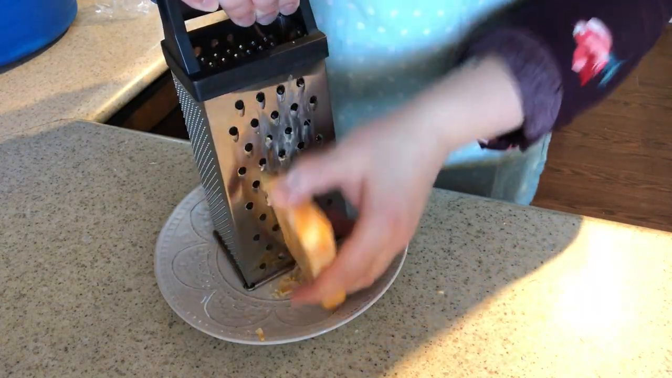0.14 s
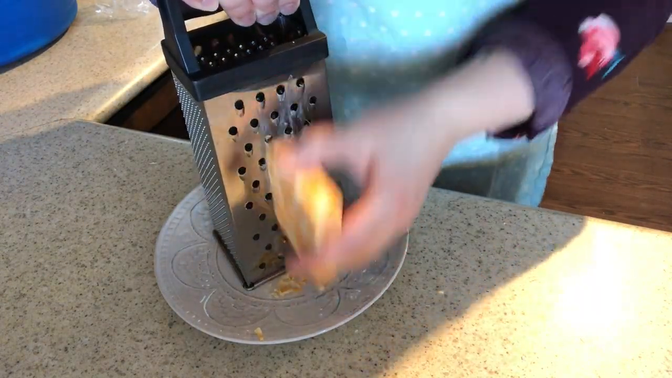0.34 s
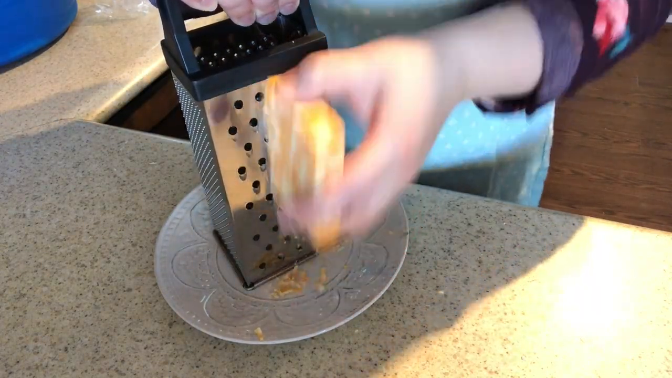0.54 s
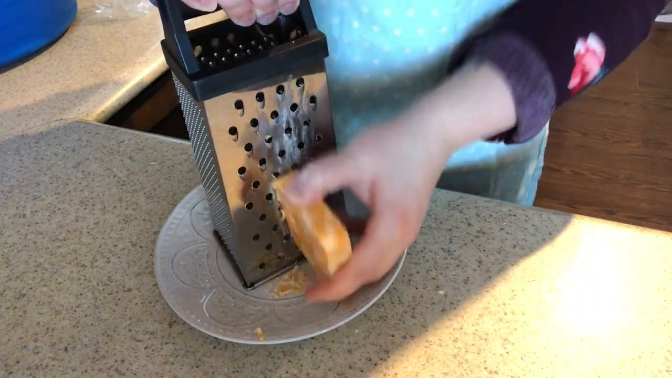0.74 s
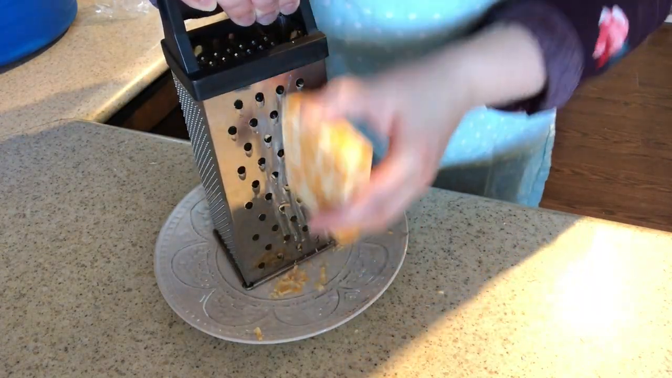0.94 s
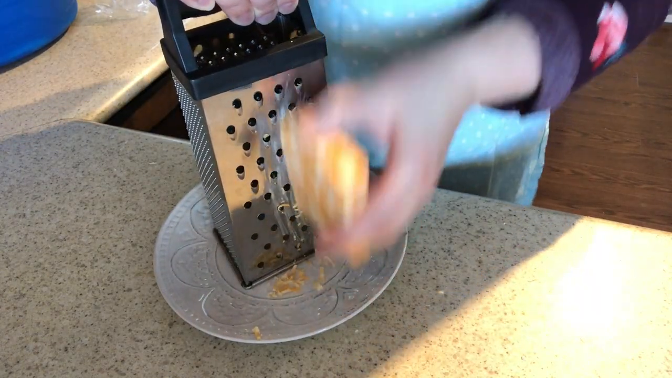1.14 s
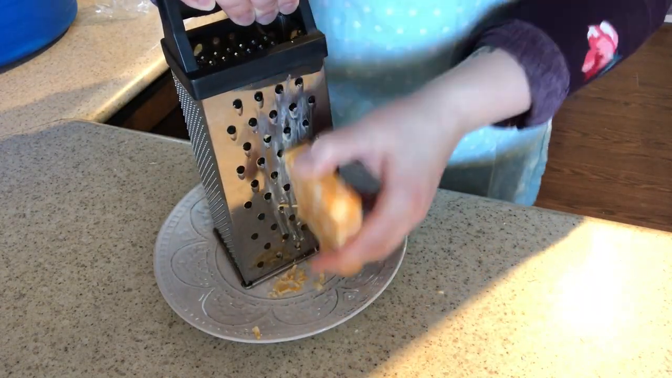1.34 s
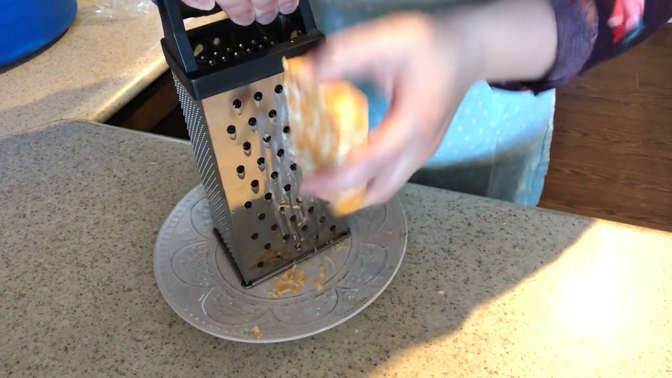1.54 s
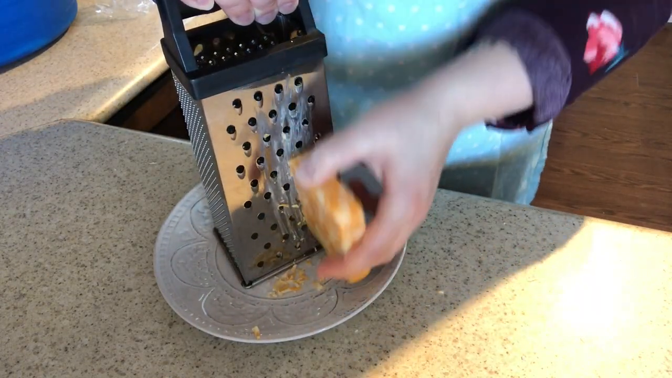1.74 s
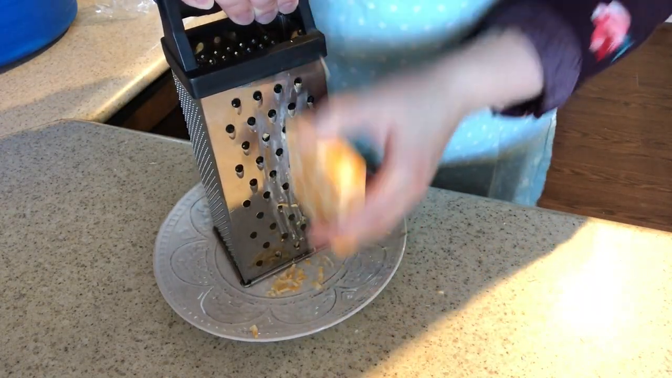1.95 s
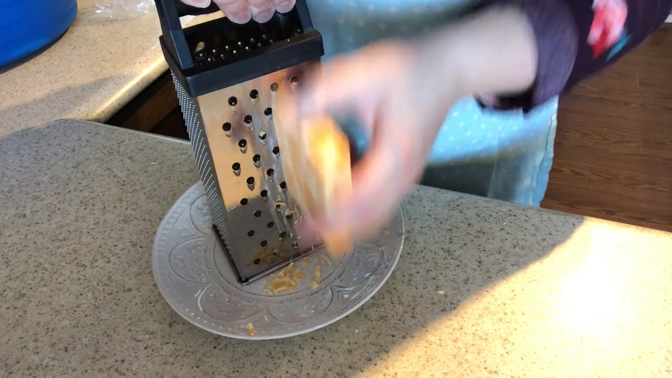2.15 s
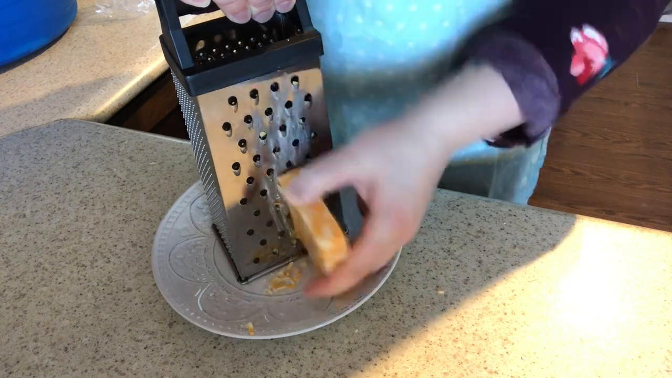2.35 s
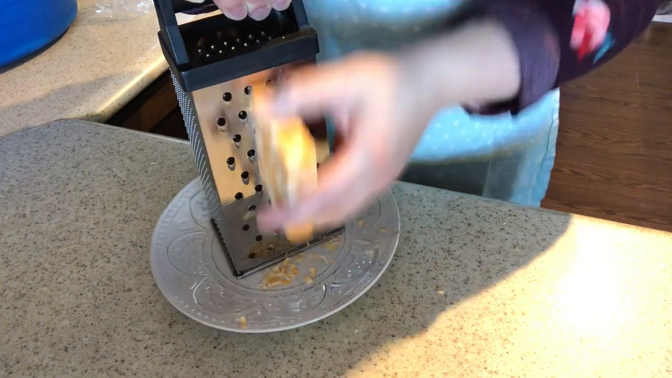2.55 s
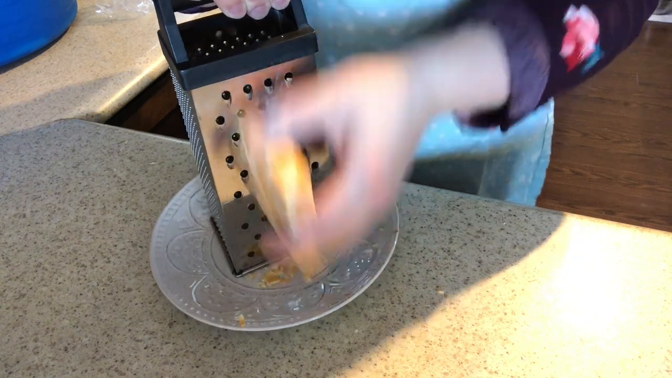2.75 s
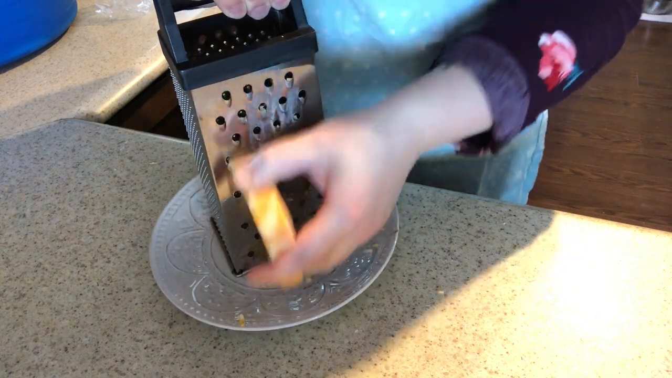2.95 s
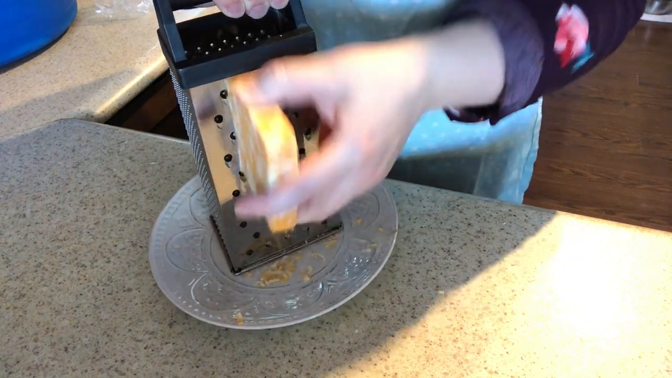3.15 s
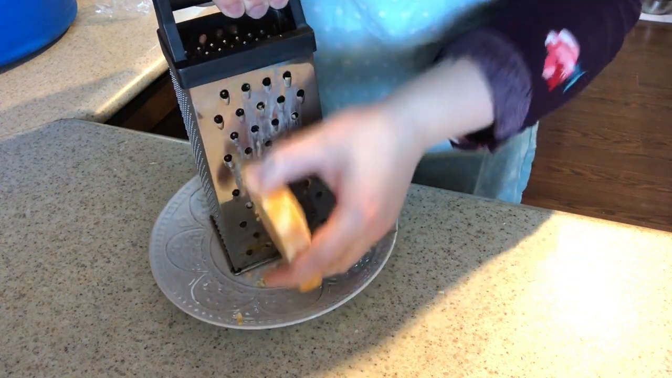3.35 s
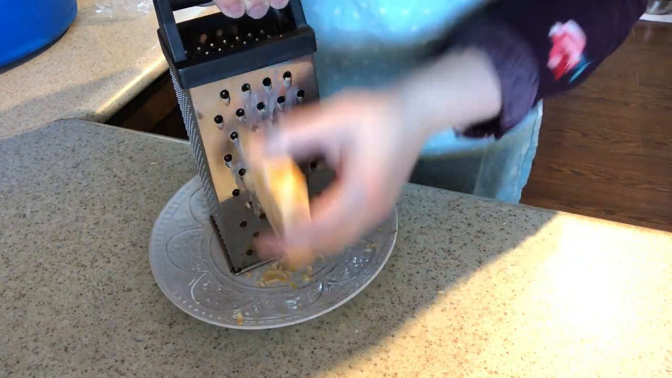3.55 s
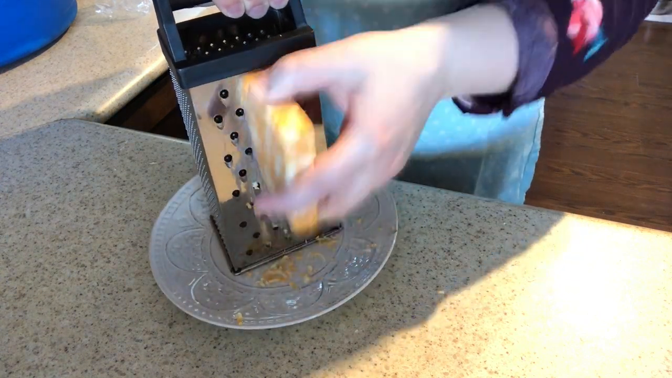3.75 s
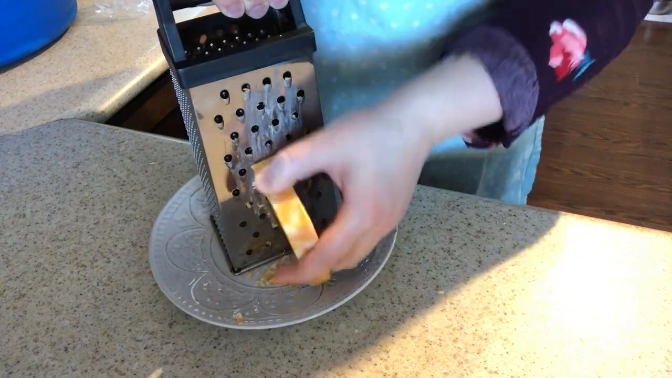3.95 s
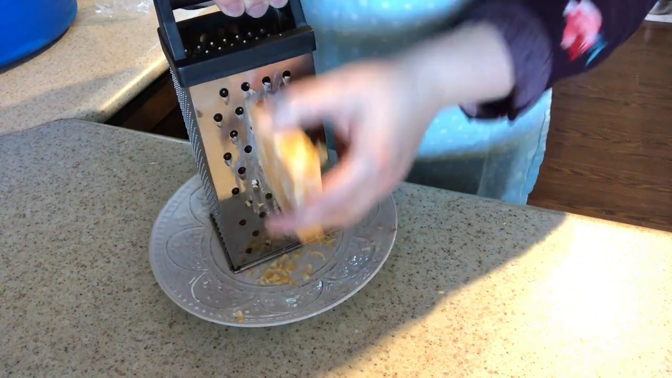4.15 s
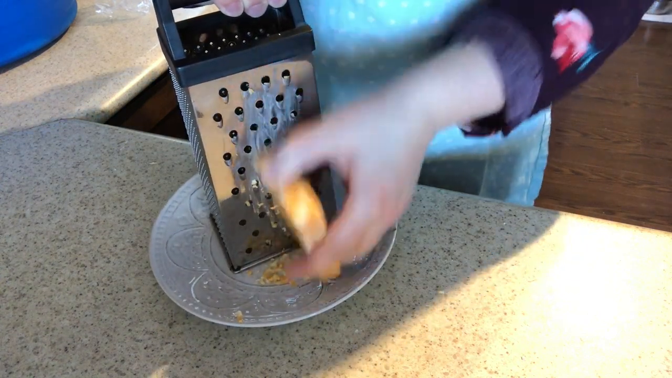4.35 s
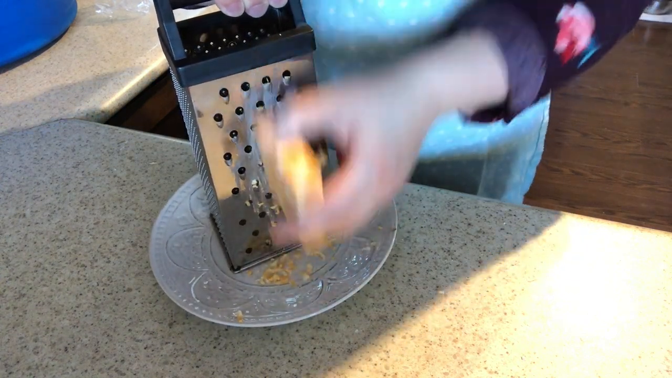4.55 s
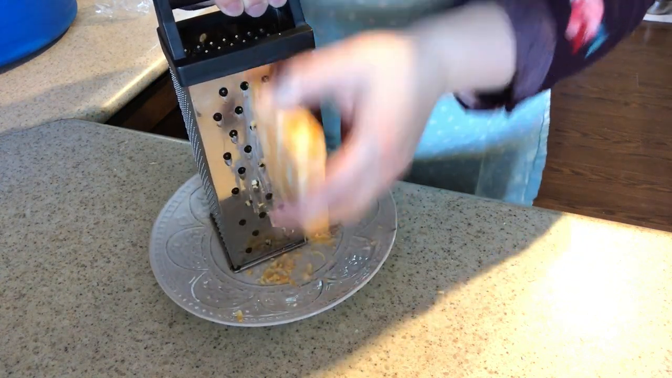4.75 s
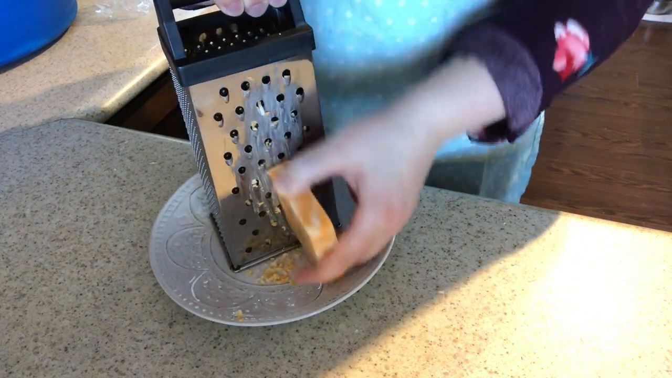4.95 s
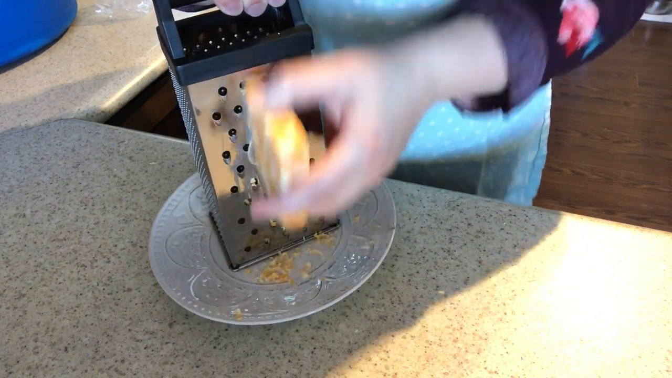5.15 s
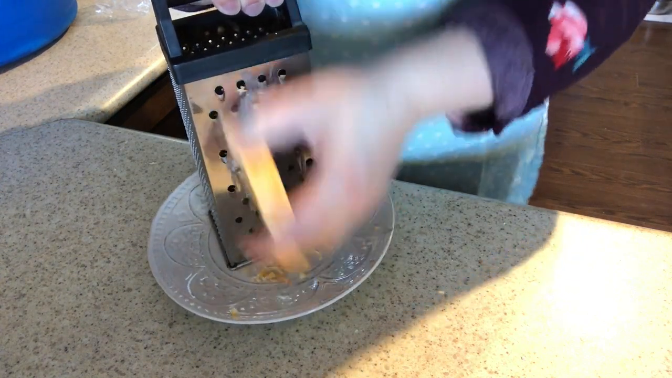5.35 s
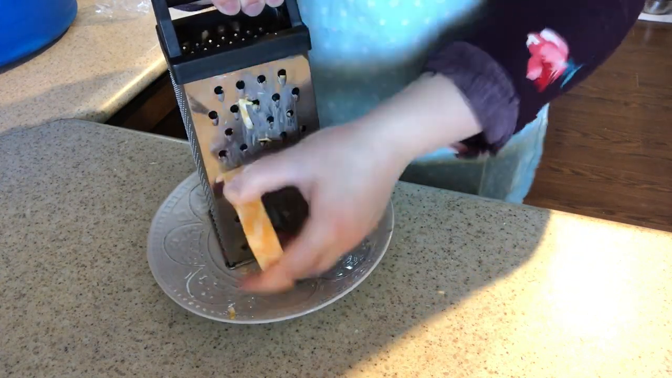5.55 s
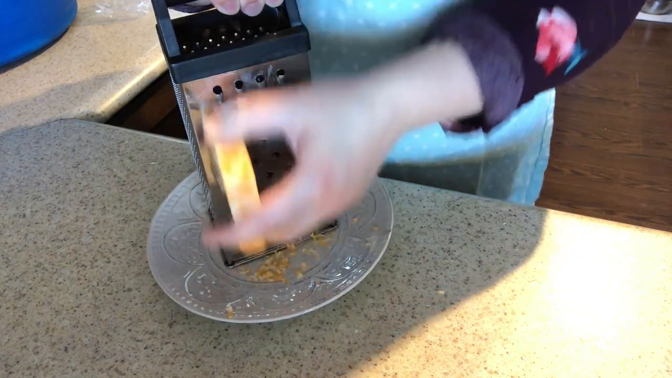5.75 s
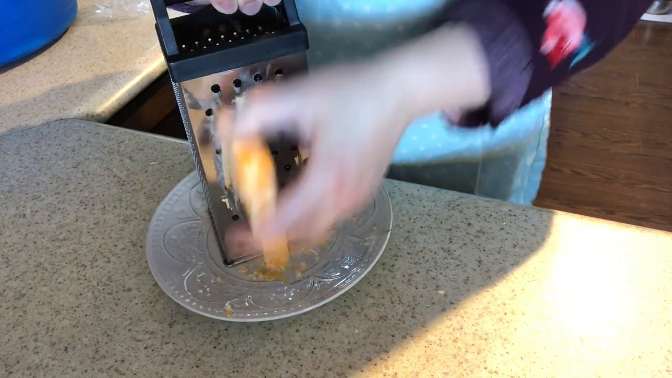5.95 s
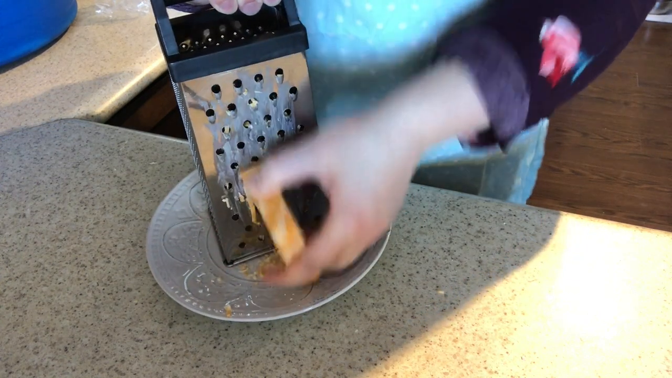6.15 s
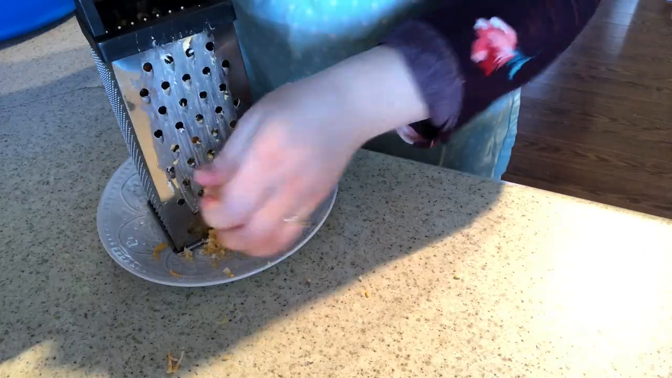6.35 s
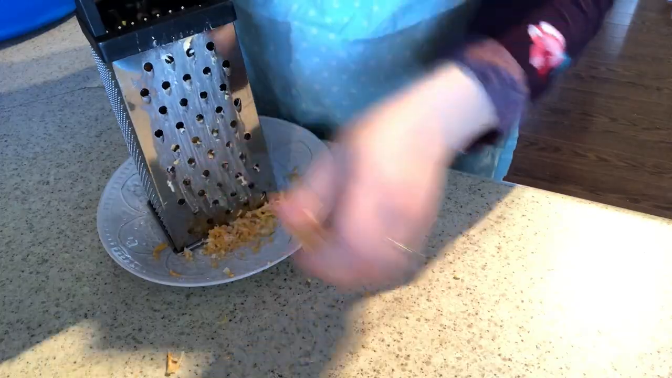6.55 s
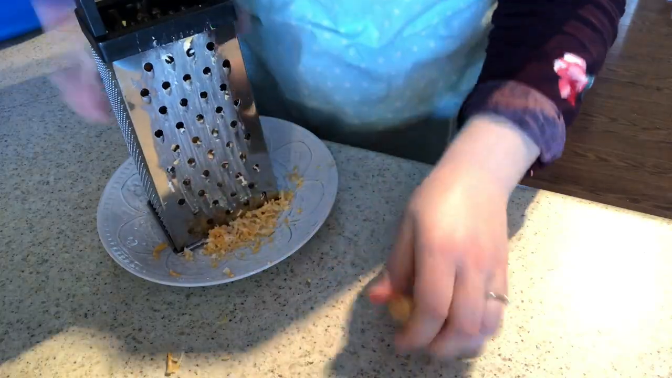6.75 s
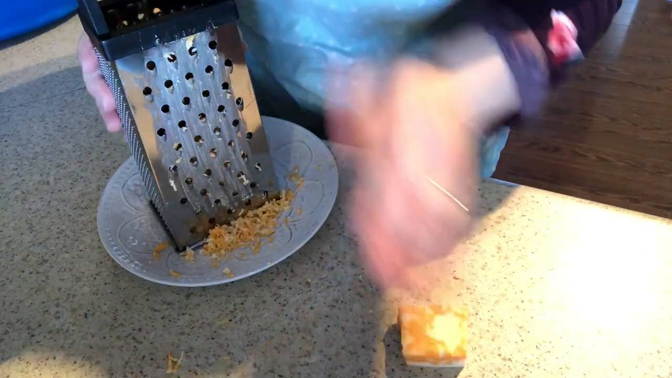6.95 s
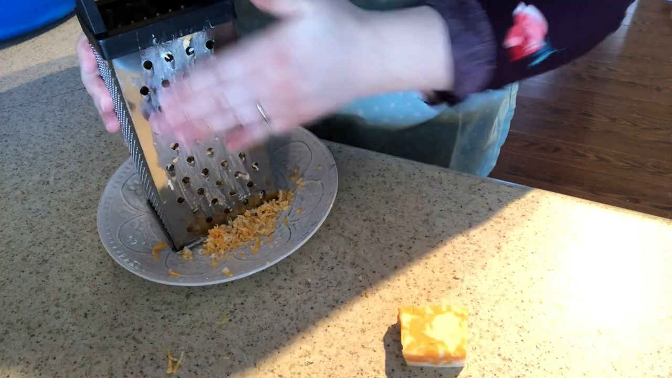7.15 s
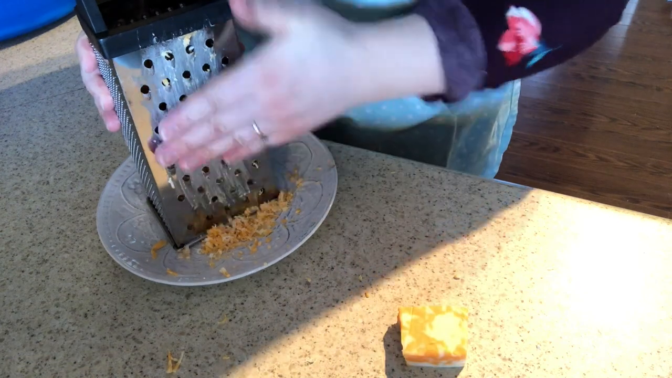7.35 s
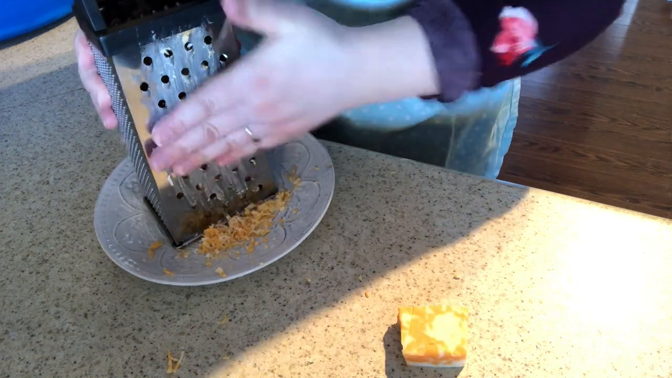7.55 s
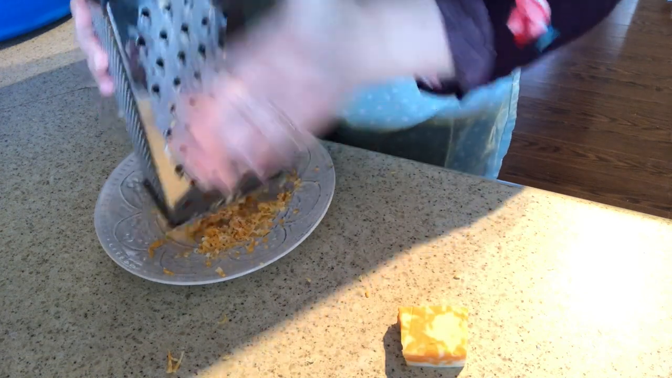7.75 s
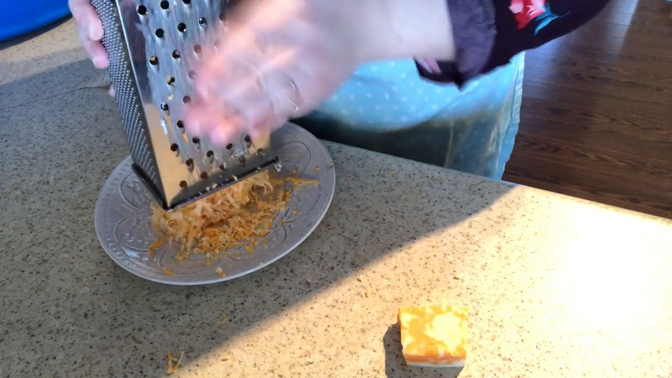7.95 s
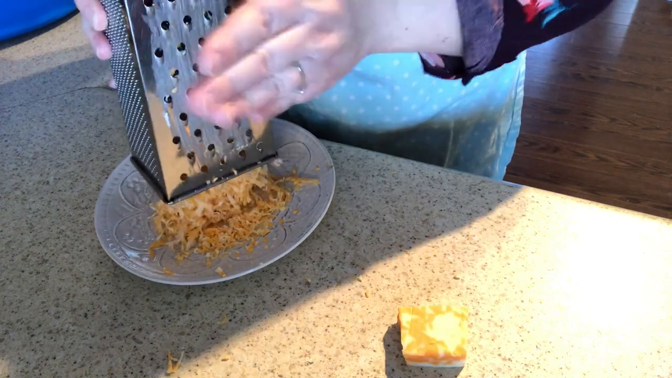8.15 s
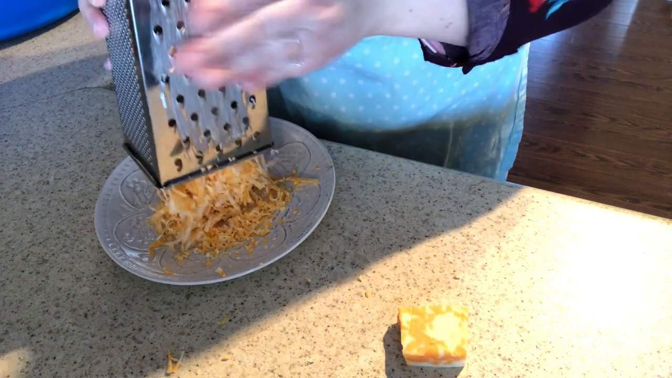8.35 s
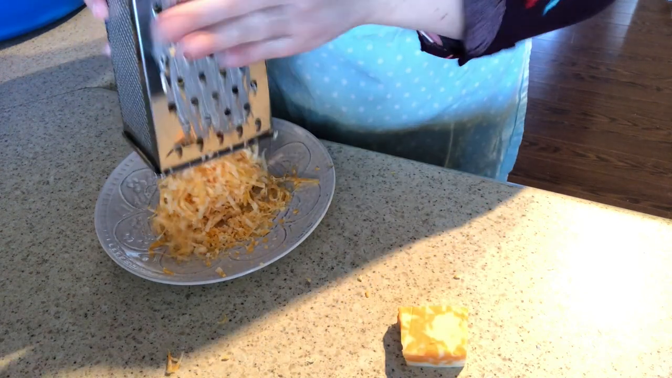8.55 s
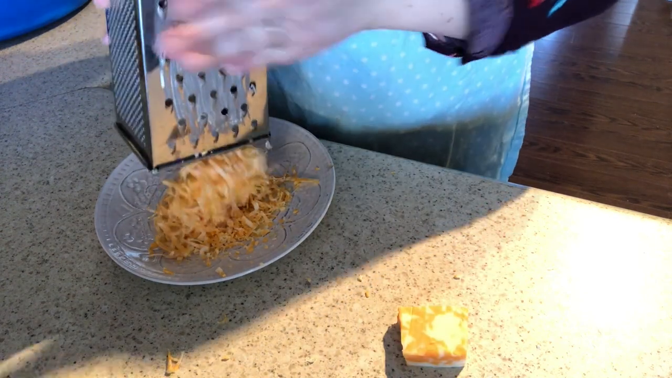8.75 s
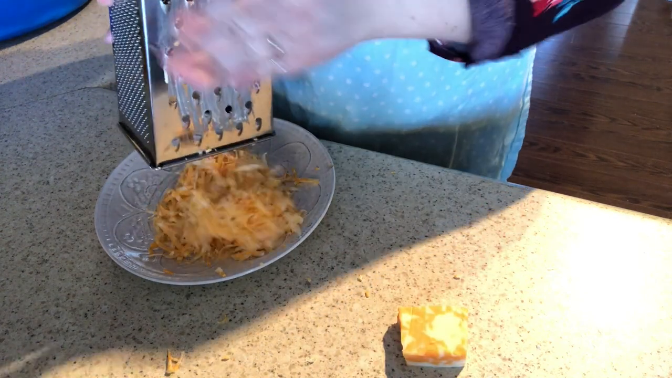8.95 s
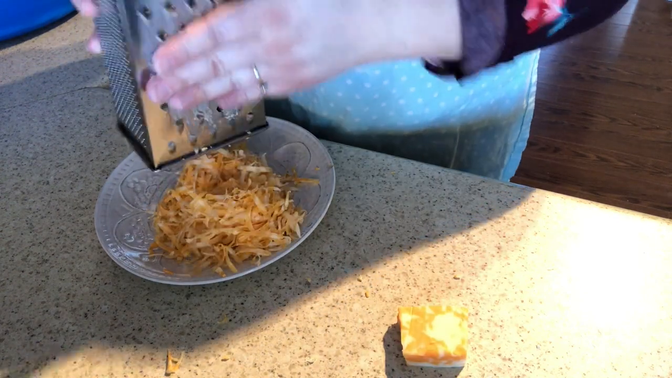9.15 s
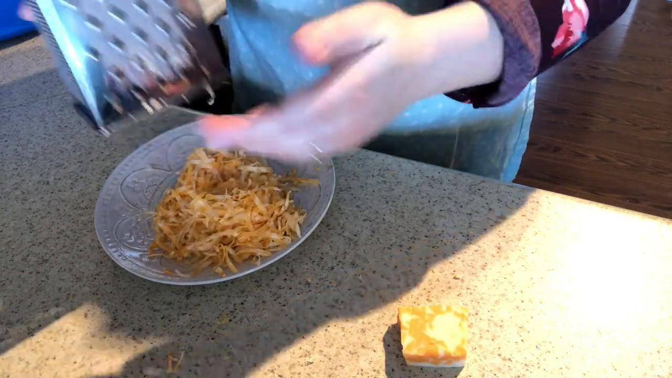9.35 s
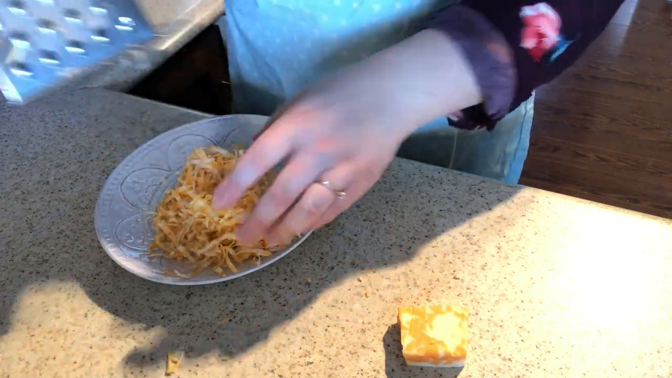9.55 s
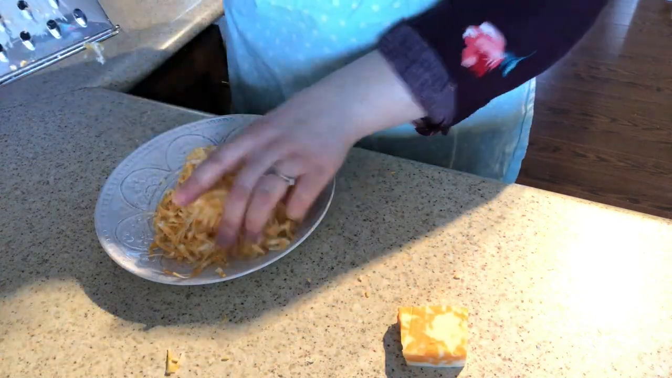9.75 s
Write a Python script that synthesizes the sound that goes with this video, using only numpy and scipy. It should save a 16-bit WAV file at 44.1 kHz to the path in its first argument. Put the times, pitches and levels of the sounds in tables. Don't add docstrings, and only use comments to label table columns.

```python
import sys
import numpy as np
from scipy import signal
from scipy.fft import rfft, irfft
from scipy.io import wavfile

SR = 44100
rng = np.random.default_rng(int(sys.argv[2]) if len(sys.argv) > 2 else 0)


def volts_from_db(level):
    exponent = np.asarray(level, float) / 20
    return 10 ** exponent


def unload_wav(signal):
    wavfile.write(
        sys.argv[1],
        SR,
        np.round(np.clip(np.atleast_2d(signal).T, -1, 1) * 32767).astype(np.int16),
    )


N = 432180


def rms_one(x):
    return x / np.sqrt(np.mean(x ** 2) + 1e-20)


def at_hz(points, hz):
    points = np.array(points)
    return np.interp(np.log(hz), np.log(points[:, 0]), points[:, 1])


def colour(x, spectrum):
    hz = np.linspace(1, SR / 2, 4097)
    level_db = np.clip(at_hz(spectrum, hz), -80, 20)
    cepstrum = irfft(np.log(volts_from_db(level_db)))
    cepstrum[1:4096] *= 2
    cepstrum[4097:] = 0
    response = irfft(np.exp(rfft(cepstrum)))
    return signal.oaconvolve(x, response / np.linalg.norm(response))[:N]


def drift(rate):
    steps = rng.standard_normal(2000)
    return np.interp(np.arange(N) * rate / SR, np.arange(len(steps)), steps)


def ring(clicks, hz, t60):
    radius = volts_from_db(-60 / (t60 * SR))
    turn = 2 * np.pi * hz / SR
    return signal.lfilter([0, np.sin(turn)], [1, -2 * radius * np.cos(turn), radius ** 2], clicks + 1e-18)


def strike(modes, times, levels_db, spread_db, rise_s=1e-5, rough=0., tilts_db=None, choke_s=None,
           waver_per_s=130):
    out = np.zeros(N + 2 * SR)
    luck = rng.standard_normal((len(times), len(modes), 202))
    blow_tilts_db = np.zeros(len(times)) if tilts_db is None else tilts_db
    for s, level_db, draws, tilt_db in zip(times, levels_db, luck, blow_tilts_db):
        for (hz, db, t60), draw in zip(modes, draws):
            length_s = min(t60 * 1.2, .7, 3 * (choke_s or 1))
            t = np.arange(int(length_s * SR)) / SR
            phase = 2 * np.pi * hz * t
            wave = np.sin(phase)
            if rough:
                a, b = (np.interp(t * waver_per_s, np.arange(100), w) for w in draw[2:].reshape(2, -1))
                share = np.clip(rough, 0, 1) * (1 - np.exp(-t / 0.01))
                wave = (1 - share + .7 * share * a) * wave + .7 * share * b * np.cos(phase)
            side = draw[1] if tilts_db is None else draws[int(hz / 1000), 1]
            gain_db = level_db + db + spread_db * draw[0] + tilt_db * np.log2(hz / 5000) - 60 * t / t60
            if choke_s:
                gain_db = gain_db - 9 * (t / choke_s) ** 3
            i = int(s * SR)
            out[i:i + len(t)] += np.sign(side) * volts_from_db(gain_db) * (1 - np.exp(-t / rise_s)) * wave
    return out[:N]


def grains(per_s, size_db):
    sizes = volts_from_db(size_db * np.minimum(rng.exponential(1, N), 4)) * rng.choice([-1, 1], N)
    return rms_one(sizes * (rng.random(N) < per_s / SR))


def contact(events, spectrum, rise_s, fall_s, level_db, shiver_s, shiver_db):
    split_hz = 3000
    t = np.arange(SR // 3) / SR
    rush_and_shiver = np.exp(-t / fall_s) + volts_from_db(shiver_db) * np.exp(-t / shiver_s)
    shape = (1 - np.exp(-t / rise_s)) * rush_and_shiver
    body, top = np.zeros(N), np.zeros(N)
    for (s, db, thud_db, top_db, *_), noise in zip(events, rng.standard_normal((len(events), len(t)))):
        i = int(s * SR)
        body[i:i + len(t)] += volts_from_db(db + level_db) * shape * noise
        top[i:i + len(t)] += volts_from_db(db + level_db + top_db + 9.0) * shape * noise
    low = signal.sosfilt(signal.butter(1, split_hz, fs=SR, output="sos"), body)
    high = signal.sosfilt(signal.butter(1, split_hz, "high", fs=SR, output="sos"), top)
    return colour(low + high, spectrum)


# (frequency [Hz], level [dB per Hz])
AIR_SPECTRUM = [(15, -31.5), (25, -5.5), (48, -2.5), (60, -9), (146, -18.5), (177, -9.5), (273, -18.5),
                (510, -19), (1550, -32), (7710, -36.5), (13300, -38.5), (14400, -50.5), (16500, -52.5)]


def room_air():
    return volts_from_db(-69.5) * colour(rng.standard_normal(N), AIR_SPECTRUM)


# (start [s], length [s], fastest point [share of the way], pace [dB], weight on counter [dB])
PULL_STROKES = [(0.0, 0.15, 0.29, -70.5, -50), (0.31, 0.14, 0.54, -74, -56), (0.625, 0.14, 0.56, -71, -52),
                (0.955, 0.27, 0.26, -70.5, -56.5), (1.27, 0.13, 0.68, -71, -56),
                (1.585, 0.14, 0.11, -68, -52), (1.92, 0.13, 0.79, -69, -51),
                (2.25, 0.22, 0.69, -64.5, -48.5), (2.565, 0.18, 0.18, -65.5, -54.5),
                (2.86, 0.12, 0.71, -70, -57), (3.17, 0.16, 0.3, -70, -53.5),
                (3.5, 0.14, 0.58, -68.5, -54.5), (3.8, 0.17, 0.6, -71.5, -57.5),
                (4.15, 0.15, 0.46, -70.5, -53), (4.47, 0.17, 0.6, -70, -52), (4.83, 0.15, 0.63, -67.5, -47),
                (5.12, 0.16, 0.59, -70, -51.5), (5.44, 0.13, 0.52, -70, -51), (5.73, 0.21, 0.23, -71, -48),
                (6.03, 0.13, 0.59, -69, -54.5)]
# (start [s], length [s], fastest point [share of the way], pace [dB], weight on counter [dB])
PUSH_STROKES = [(0.15, 0.14, 0.25, -71, -56), (0.465, 0.14, 0.62, -77.5, -54), (0.78, 0.13, 0.65, -78, -57),
                (1.1, 0.16, 0.21, -85.5, -72), (1.42, 0.15, 1, -70, -52.5), (1.775, 0.11, 0.63, -72, -53),
                (2.075, 0.14, 0.49, -69.5, -51.5), (2.4, 0.15, 0.21, -67.5, -50.5),
                (2.715, 0.12, 0.4, -76, -49), (3.04, 0.12, 0.37, -72, -51),
                (3.365, 0.14, 0.2, -72.5, -55.5), (3.67, 0.14, 0.36, -71.5, -52.5),
                (4.0, 0.14, 0.38, -72, -54), (4.32, 0.17, 0.37, -73.5, -53.5),
                (4.65, 0.15, 0.52, -69.5, -54), (4.97, 0.14, 0.54, -73, -53), (5.29, 0.13, 0.45, -68, -51),
                (5.59, 0.16, 0.41, -68, -53), (5.88, 0.13, 0.57, -79, -52.5), (6.145, 0.11, 0.1, -66, -47)]
# (start [s], length [s], fastest point [share of the way], pace [dB], weight on counter [dB])
SLIDES = [
    (6.45, 0.14, 0.68, -65.5, -55),
    (6.575, 0.13, 0.13, -79.5, -61.5),
    (6.795, 0.098, 0.15, -64.5, -52),
    (6.95, 0.3, 0.18, -73.5, -56.5),
]
PULL_BITE_DB, PUSH_BITE_DB, SLIDE_BITE_DB = 2, 5.5, 1
RASP_FROM_PACE = 0.65
RASP_POWER, RUMBLE_POWER, HISS_POWER = 0.81, 0.8, 1
CREEP, CREEP_S = 0.13, 0.014


def motion():
    t = np.arange(N) / SR
    gains = np.zeros((3, N))
    powers = [RASP_POWER, RUMBLE_POWER, HISS_POWER]
    for table, bite_db in [(PULL_STROKES, PULL_BITE_DB), (PUSH_STROKES, PUSH_BITE_DB), (SLIDES, SLIDE_BITE_DB)]:
        for s, length, fastest, pace_db, weight_db in table:
            span = slice(max(int((s - CREEP_S) * SR), 0), int((s + length + CREEP_S) * SR))
            turns = s + length * np.array([0, np.clip(fastest, .05, .95), 1])
            arc = np.interp(t[span], turns, [0, np.pi / 2, np.pi])
            speed = CREEP + np.sin(arc).clip(0)
            rasp_db = bite_db + RASP_FROM_PACE * pace_db + (1 - RASP_FROM_PACE) * weight_db
            for gain, db, power in zip(gains, [rasp_db, weight_db, pace_db], powers):
                gain[span] += volts_from_db(db) * speed ** power
    return gains


# (frequency [Hz], level [dB], t60 [s])
TEETH_MODES = [(847, 1, 0.06), (1157, -5, 0.0073), (1810, -6.5, 0.073), (2134, 1, 0.27), (2120, -4.5, 0.03),
               (2710, -11, .05), (3320, -0.5, 0.086), (4900, -5, 0.075)]
# (frequency [Hz], level [dB per Hz])
RASP_SPECTRUM = [(180, -33), (300, -11), (400, 2.5), (441, -10.5), (764, -10.5), (3100, -18.5), (4550, -20),
                 (8000, -36), (10400, -58.5), (17600, -120)]
# (frequency [Hz], level [dB per Hz])
HISS_SPECTRUM = [(2350, -30), (4000, 0), (6130, -4.5), (9450, -6.5), (15200, -8), (16100, -25),
                 (16500, -43.5)]
# (frequency [Hz], level [dB], t60 [s])
COUNTER_MODES = [(79.1, -8, 0.16), (152, 2, 0.11), (214.8, 7, 0.048), (258, -8, 0.07), (342.8, -6, 0.076)]


def strokes():
    rasp_gain, rumble_gain, hiss_gain = motion()
    judder = drift(60).clip(-2.5, 1.3)
    tearing = grains(2300, size_db=2.3)
    snags = grains(400, size_db=1.0)
    sheet = rms_one(sum(volts_from_db(db) * ring(snags, hz, t60) for hz, db, t60 in TEETH_MODES))
    rasp = colour(tearing + 0.28 * snags + 0.17 * sheet, RASP_SPECTRUM) * rasp_gain * volts_from_db(4.7 * judder)
    hiss = colour(grains(10000, size_db=5.0), HISS_SPECTRUM) * hiss_gain * volts_from_db(1.8 * judder)
    jolts = grains(400, size_db=3.0) * rumble_gain * volts_from_db(3.5 + 2 * drift(22))
    rumble = sum(volts_from_db(db - 33) * ring(jolts, hz, 0.79 * t60) for hz, db, t60 in COUNTER_MODES)
    return rasp + hiss + rumble


# (frequency [Hz], t60 [s], level [dB])
KITCHEN_DECAY = [(100, 0.8, -2), (250, 0.7, -4), (400, 0.52, 0), (800, .6, 3), (1500, 0.66, -1),
                 (5000, 0.5, -0.5), (14000, 0.34, 0.5)]


def kitchen(x):
    hz, s, cells = signal.stft(rng.standard_normal(SR), SR, nperseg=512)
    t60 = at_hz([(f, decay) for f, decay, _ in KITCHEN_DECAY], hz + 1)[:, None]
    db = at_hz([(f, level) for f, _, level in KITCHEN_DECAY], hz + 1)[:, None]
    tail = signal.istft(cells * volts_from_db(db - 60 * s / t60), SR, nperseg=512)[1][:SR]
    tail = tail * np.clip((np.arange(SR) / SR - .004) / 0.0028, 0, 1)
    return signal.oaconvolve(x, tail / np.linalg.norm(tail))[:N]


def thuds(events, level_db):
    s, db, thud_db = np.transpose(events)[:3]
    return strike(COUNTER_MODES, s + 0.0033, db + thud_db + level_db, 0.93)


# (time [s], peak level [dB], thud re peak [dB], top re peak [dB])
GRATER_BUMPS = [(0.104, -51.5, 9.5, -4), (0.962, -51.5, 0, -33), (1.583, -41, 1.5, -6),
                (2.861, -41, -2.5, -10.5), (3.084, -42.5, -13, -22), (3.369, -39.5, -16, -16),
                (4.062, -44, 3, -14), (4.533, -68, 1.5, -32), (5.589, -47.5, -13, -6),
                (5.647, -39.5, -2, -16), (5.726, -38.5, -11.5, -26), (5.825, -35, 9, -26.5),
                (5.944, -52, -14, 6.5), (6.284, -47.5, -5, -11), (6.807, -55.5, 15.5, -18),
                (6.84, -44.5, 3, -19.5), (6.891, -50, 5, -25.5), (6.945, -53.5, 15.5, -6),
                (7.08, -42, -5, -12.5), (7.108, -17.5, -8.5, -8), (7.214, -37, 0.5, -9.5),
                (7.422, -42, 2.5, -21.5)]
# (time [s], peak level [dB], top re peak [dB])
BLOCK_TAPS = [(0.307, -37, -12), (0.461, -35, -15), (0.621, -42, -9), (0.798, -53, -7), (1.42, -47.5, -7),
              (1.433, -44.5, -6.5), (1.774, -39.5, -17), (1.918, -44.5, -6), (2.074, -42.5, -7.5),
              (2.249, -53, -33), (2.565, -50.5, 1), (2.6988, -52, -9.5), (5.4869, -51.5, -10.5),
              (5.9466, -48, -7.5), (1.5388, -47, -8), (3.099, -47, -15), (2.715, -33.5, -15),
              (3.028, -55, -5), (3.039, -36.5, -12), (3.357, -48, -12), (3.171, -47, -19),
              (3.669, -36.5, -10.5), (3.997, -37.5, -9), (4.319, -46, -19.5), (4.652, -38.5, -6.5),
              (4.873, -54.5, 6), (5.291, -33, -11.5), (6.086, -63, 16.5), (6.149, -32, -20),
              (6.458, -65.5, 0.5), (6.499, -53.5, 5.5)]
# (frequency [Hz], level [dB per Hz])
TAP_SPECTRUM = [(150, -28.5), (250, -2.5), (3410, -13), (8480, -27.5), (15100, -30), (16500, -55)]


def taps():
    thud_db = -18.5
    landings = [(s, db, thud_db, top_db) for s, db, top_db in BLOCK_TAPS] + GRATER_BUMPS
    touch = contact(landings, TAP_SPECTRUM, .0012, 0.0059, level_db=-4.0, shiver_s=0.034, shiver_db=-13.0)
    return touch + thuds(landings, level_db=-4.5)


# (time [s], peak level [dB], pitch [Hz], t60 [s])
DULL_KNOCKS = [(0.105, -28.5, 152, 0.069), (1.534, -31, 148, 0.14), (2.361, -25.5, 156.7, 0.051),
               (5.829, -15.5, 149.3, 0.11), (6.285, -35.5, 252, 0.069), (6.512, -33.5, 163, 0.083),
               (6.807, -33, 151.5, 0.13), (6.946, -25, 215, 0.061), (6.945, -31.5, 406, 0.062),
               (6.843, -36.5, 420, 0.043), (7.082, -42, 166.5, 0.055), (6.81, -37, 300, .06),
               (6.947, -33.5, 280, 0.069), (6.52, -41.5, 270, .08), (2.863, -42, 480, .06),
               (3.09, -43, 446, 0.085), (9.075, -38, 60, .09), (2.362, -34.5, 62, .15),
               (1.93, -43, 75, .15), (7.116, -18, 310, 0.056), (7.117, -21.5, 660, 0.06),
               (7.526, -26.5, 597, 0.095), (7.526, -28, 940, 0.094), (7.32, -30, 670, .07),
               (8.437, -33, 480, .1), (8.865, -38.5, 457.4, 0.098), (7.323, -26, 156, 0.15),
               (7.534, -25, 150, 0.2), (1.0603, -28.5, 375, 0.04), (1.0605, -27, 700, 0.038),
               (2.358, -33, 625, .1), (2.358, -25.5, 800, 0.052), (4.9295, -50, 610, 0.022),
               (7.221, -35.5, 200, 0.097), (7.424, -33.5, 250, .1)]


def knocks():
    rings = 0
    for s, db, hz, t60 in DULL_KNOCKS:
        notes = [(hz, -2.5, t60), (1.6 * hz, -10, .5 * t60), (2.7 * hz, -13, 0.29 * t60)]
        rings = rings + strike(notes, [s], [db], 0, 0.0005)
    return signal.sosfilt(signal.butter(2, 900, fs=SR, output="sos"), rings)


# (time [s], peak level [dB], pitch [Hz])
TOOTH_PINGS = [(0.157, -57, 3830), (0.175, -48.5, 5050), (0.6634, -50.5, 4340), (0.7058, -48.5, 2080),
               (0.7986, -48, 2130), (1.599, -52, 1950), (2.2495, -49.5, 1810), (3.177, -56, 2190),
               (3.709, -51, 4020), (4.4044, -60, 2210), (4.459, -56, 4720), (5.7543, -52, 2710),
               (6.025, -62, 2150), (6.086, -39.5, 2200), (6.0915, -41, 2230), (4.8723, -51, 2150),
               (2.5666, -50, 3500), (3.182, -50, 1000), (7.799, -40, 3140), (1.438, -46, 1990),
               (1.97, -49.5, 5000), (1.821, -54, 4500), (6.137, -50, 1870), (6.548, -46, 3120),
               (6.556, -51, 3080), (6.554, -54, 2500), (6.6004, -70, 1797)]


def pings():
    out = 0
    for s, db, hz in TOOTH_PINGS:
        out = out + strike([(hz, -4, .035), (1.22 * hz, -9, .02), (1.63 * hz, -12, .012)], [s], [db], 1)
    return out


# (time [s], peak level [dB], pitch [Hz])
TOOTH_CATCHES = [(0.5327, -52, 1798), (1.751, -55, 5040), (1.7742, -48, 1120), (2.0944, -48, 1270),
                 (2.1694, -48, 3500), (2.9576, -53, 2090), (3.292, -52, 1305), (3.833, -57, 1227),
                 (3.9473, -59, 2250), (4.1521, -57.5, 1205), (4.4779, -50, 968), (4.639, -48, 1684),
                 (4.828, -61, 968), (5.2793, -47.5, 965), (5.4377, -53, 1120), (5.643, -39, 4382),
                 (5.87, -54, 2476), (6.0977, -45, 2680), (6.2451, -53.5, 2510), (6.4916, -48.5, 2971),
                 (6.515, -43, 970), (6.943, -51.5, 2020)]
# (frequency [Hz], level [dB per Hz])
SNAP_SPECTRUM = [(300, -8), (1500, -6.5), (4000, 0), (7000, -5), (15000, -4.5), (16500, -17)]


def catches():
    snags = [(s, db, 0, -11) for s, db, _ in TOOTH_CATCHES]
    out = contact(snags, SNAP_SPECTRUM, .0005, 0.0032, level_db=-8.5, shiver_s=.015, shiver_db=-15)
    for s, db, hz in TOOTH_CATCHES:
        out = out + strike([(hz, -5, .03), (1.4 * hz, -9, .02)], [s], [db], 0.99)
    return out


# (time [s], peak level [dB], thud re peak [dB], top re peak [dB], ring tilt [dB per octave])
FOOT_CLINKS = [
    (1.0602, -8.5, -31, -5.5, 0.5),
    (2.3567, -4, -29.5, -6, 3),
    (4.9318, -6.5, -31, -6, 2),
]
# (frequency [Hz], level [dB per Hz])
CRACK_SPECTRUM = [(240, -37.5), (400, -7), (1290, -18.5), (4680, -9.5), (14800, -26.5), (16500, -43.5)]
PLATE_PITCHES = [1660, 2250, 2525, 2605, 3080, 3490, 3524, 4652, 4712, 4930, 5925, 6115, 6955, 7368, 8043,
                 8328, 8926, 9954, 10655, 12465, 13020, 13670, 14410, 15190]
PLATE_DECAYS = [0.51, .36, 0.23, .19, 0.11, .36, 0.25, .31, .26, .4, .33, 0.29, .18, .4, .15, .2, .24, .24,
                .45, .34, .2, .24, .2, .14]
# (level of each mode [dB]), clink by clink
PLATE_LEVELS = [
    (-29.0, -18.0, -15.0, -16.0, -18.0, -15.0, -3.0, 2.0, -4.0, -25.0, -4.0, -15.0, -10.0, -8.0, -14.0, -16.0, -9.0, -27.0, -10.0, -14.0, -18.0, -26.0, -21.0, -25.0),
    (-32.0, -16.0, -14.0, -14.0, -8.0, -9.0, -5.0, -2.0, -7.0, -20.0, -17.0, -8.0, -14.0, -3.0, -12.0, -11.0, -8.0, -26.0, -9.0, -17.0, -17.0, -27.0, -17.0, -33.0),
    (-24.0, -34.0, -10.0, -22.0, -16.0, -12.0, -3.0, 0.0, -12.0, -37.0, -7.0, -9.0, -23.0, -9.0, -23.0, -26.0, -9.0, -35.0, -13.0, -12.0, -30.0, -36.0, -17.0, -34.0),
]
# (delay [s]), clink by clink
CHOKE_DELAYS = [0.014, .0095, 0.012]
# (clink number [0 = first], delay after it [s], level re it [dB])
FOOT_REBOUNDS = [
    (0, .0105, -15),
    (1, .018, -15),
    (2, .012, -18),
]


def clinks():
    shared_tilt_db, long_rough = -5, .95
    split = 1 + .004 * rng.uniform(-1, 1, len(PLATE_PITCHES))
    crack = contact(FOOT_CLINKS, CRACK_SPECTRUM, 0.00034, 0.003, level_db=-15.0, shiver_s=0.031, shiver_db=-21)
    out = crack + thuds(FOOT_CLINKS, level_db=-4.0)
    for n, ((s, db, _, _, tilt_db), modes_db, choke_s) in enumerate(zip(FOOT_CLINKS, PLATE_LEVELS, CHOKE_DELAYS)):
        modes = list(zip(PLATE_PITCHES, modes_db, PLATE_DECAYS))
        first_ring = [(hz, m, 0.3 * t60) for hz, m, t60 in modes]
        blows = [(0.00039, 0.00046)] + [(late, g) for which, late, g in FOOT_REBOUNDS if which == n]
        for late, g in blows:
            blow_tilt_db = tilt_db + 3.5 + shared_tilt_db * (late > 0)
            out += strike(first_ring, [s + late + .0001], [db + g - 8.5], 0, .00015,
                          tilts_db=[blow_tilt_db], choke_s=choke_s)
        long_ring = [(hz, m, 0.72 * t60 * (4000 / hz) ** 0.4) for hz, m, t60 in modes]
        twins = [(hz * k, m, 0.85 * t60 * (4000 / hz) ** 0.35) for k, (hz, m, t60) in zip(split, modes)]
        out += strike(long_ring, [s + .001], [db - 24.0], 0, rough=long_rough, tilts_db=[tilt_db])
        out += strike(twins, [s + .001], [db - 23.5], 0, rough=long_rough)
    return out


# (time [s], peak level [dB], thud re peak [dB], top re peak [dB])
HAND_SLAPS = [
    (7.112, -19, -33, -10.5),
    (7.3173, -13.5, -21.5, -13.5),
    (7.5226, -10, -20.5, -10.5),
    (7.7942, -18, -26.5, -13.5),
    (8.0003, -14, -27, -6.5),
    (8.2185, -14.5, -23, -7.5),
    (8.434, -12, -24.5, -11),
    (8.649, -12.5, -24.5, -12.5),
    (8.862, -15, -22, -12.5),
    (9.0695, -16, -30, -15),
]
# (frequency [Hz], level [dB per Hz])
PALM_SPECTRUM = [(88, -43), (250, -6.5), (1050, -3.5), (4600, -9), (5930, -8.5), (8970, -12.5),
                 (15000, -14.5), (16500, -22)]
# (time [s], peak level [dB])
FINGER_SNAPS = [(7.113, -12), (7.1139, -15.5), (7.1151, -10), (7.318, -11), (7.3217, -8.5), (7.3212, -12),
                (7.5229, -9), (7.523, -10), (7.525, -14.5), (7.7965, -11.5), (7.7981, -15), (7.8002, -21),
                (8.0037, -16), (8.002, -22.5), (8.0078, -7), (8.2208, -11.5), (8.2204, -19.5),
                (8.4358, -11), (8.4355, -13.5), (8.4402, -13), (8.6534, -11), (8.8637, -26), (8.8657, -16),
                (8.8685, -23), (9.0702, -24.5), (9.074, -16), (9.0748, -12)]
# (frequency [Hz], t60 [s])
BOX_NOTES = [(255, 0.084), (340, 0.096), (430, .08), (520, 0.075), (680, .07), (850, .07), (1060, 0.06),
             (1240, 0.038)]
# (level of each note [dB]), slap by slap
BOX_LEVELS = [(-18.5, -21, -29, -25.5, -32.5, -37, -42, -49.5),
              (-16.5, -31.5, -28, -21.5, -35.5, -32, -36, -42.5),
              (-20, -25, -31, -21, -34, -33.5, -33.5, -47.5),
              (-32.5, -29, -34.5, -36.5, -38.5, -41, -44.5, -47),
              (-35.5, -24, -32.5, -24, -33, -35.5, -26.5, -37.5),
              (-39.5, -27, -33.5, -28.5, -33, -33, -25, -23.5),
              (-40, -29.5, -34.5, -30.5, -36, -35, -32, -35.5),
              (-46.5, -30, -34, -29, -34.5, -36, -29.5, -33),
              (-37, -38.5, -36.5, -30.5, -38, -34.5, -40, -42),
              (-24.5, -22, -26, -21, -30.5, -35, -30, -32)]
HAND_GRIP = [(1.001, 1.1), (1.001, 1.01), (1.001, 1.01), (1.001, 0.96), (1.001, 0.93), (1.001, 1.02),
             (1.001, 0.99), (1.001, 0.91), (1.001, 1.01), (1.001, 0.67)]
# (frequency [Hz], level [dB], t60 [s])
WALL_MODES = [(2310, -13.5, 0.15), (1877, -27.5, .04), (3120, -4, .07), (3230, -3, 0.07),
              (3350, -5.5, 0.06), (4220, -15, .04)]
# (frequency [Hz], t60 [s])
SHEET_CLANGS = [(2100, .04), (3150, .06), (6000, .04)]
# (level of each clang [dB]), slap by slap
SHEET_LEVELS = [(-40, -30, -43), (-29, -32, -29), (-23, -40, -34), (-42, -28, -47), (-33, -25, -23),
                (-35, -31, -39), (-32, -38, -30), (-27, -26, -37), (-41, -39, -37), (-40, -43, -32)]


def slaps():
    bloom_s, bloom_late_s = 0.0015, 0.001996
    hum_db, hum_longer = -16, 3.6
    rough = .95
    s, db, puff_db, _ = np.transpose(HAND_SLAPS)
    boom, clang = 0, 0
    for at, notes_db, (pitch, length), clangs_db in zip(s, BOX_LEVELS, HAND_GRIP, SHEET_LEVELS):
        notes = [(hz * pitch, g + 3, t60 * length) for (hz, t60), g in zip(BOX_NOTES, notes_db)]
        hum = [(hz, g, hum_longer * t60) for hz, g, t60 in notes[1:]]
        boom = boom + strike(notes, [at + bloom_late_s], [0], 0, bloom_s, rough=0.75, waver_per_s=90)
        boom = boom + strike(hum, [at + 0.00997], [hum_db], 2.8, 0.0091, rough=rough, waver_per_s=110)
        clangs = [(hz, g, t60) for (hz, t60), g in zip(SHEET_CLANGS, clangs_db)]
        clang = clang + strike(clangs, [at + .001], [3.0], 0, .0015, rough=rough, waver_per_s=500)
    puff = strike([(55.7, 2.0, 0.0098), (111, 12.8, 0.019)], s + 0.004, db + puff_db, 0.74)
    palm = contact(HAND_SLAPS, PALM_SPECTRUM, 0.00066, 0.0071, level_db=-3.5, shiver_s=0.054, shiver_db=-26.5)
    fingers = [(at - .0004, g, 0, -11) for at, g in FINGER_SNAPS]
    snaps = contact(fingers, SNAP_SPECTRUM, .0001, 0.00059, level_db=-0.5, shiver_s=0.0039, shiver_db=-23.5)
    walls = sum(volts_from_db(g - 46.5) * ring(palm, hz, t60) for hz, g, t60 in WALL_MODES)
    return clang + palm + snaps + walls + boom + puff


def scene():
    near = strokes() + taps() + knocks() + pings() + catches() + clinks() + slaps()
    drop_s = 6.298
    drop_db = np.interp(np.arange(N) / SR - drop_s, [0, .002, .16], [0, -16, 0])
    return (volts_from_db(drop_db) * (near + volts_from_db(-17.0) * kitchen(near)) + room_air())[None]


def top_cut(x):
    return signal.sosfilt(signal.butter(12, 17100, fs=SR, output="sos"), x)


def record(dry):
    step_hz, step_db = 8150, -5
    bass_lag_s, bass_lag_hz = .013, 130
    x = signal.sosfilt(signal.butter(5, 50, "high", fs=SR, output="sos"), dry)
    hz = np.arange(N // 2 + 1) * SR / N
    step = volts_from_db(np.interp(hz, [step_hz - 40, step_hz + 40], [0, step_db]))
    lag = np.exp(-2j * np.pi * bass_lag_s * bass_lag_hz * np.arctan(hz / bass_lag_hz))
    x = irfft(rfft(x) * step * lag, N)
    x = .5 * np.tanh(x / .5)
    x = signal.sosfilt(signal.cheby2(10, 60, 17200, fs=SR, output="sos"), x)
    return top_cut(x)


dry = scene()
out = record(dry)
unload_wav(out)
```